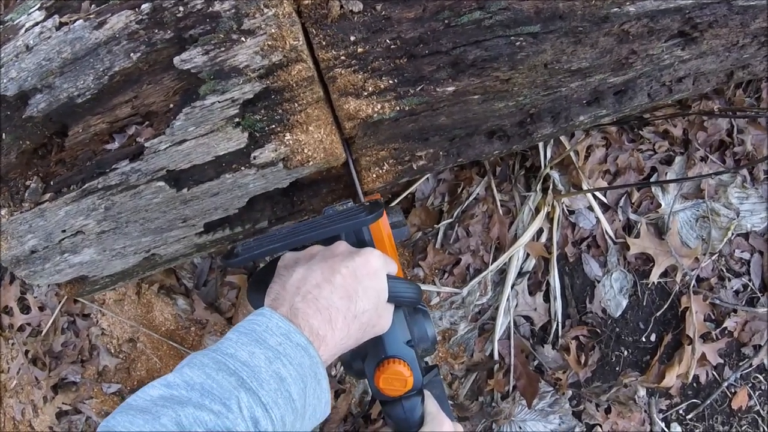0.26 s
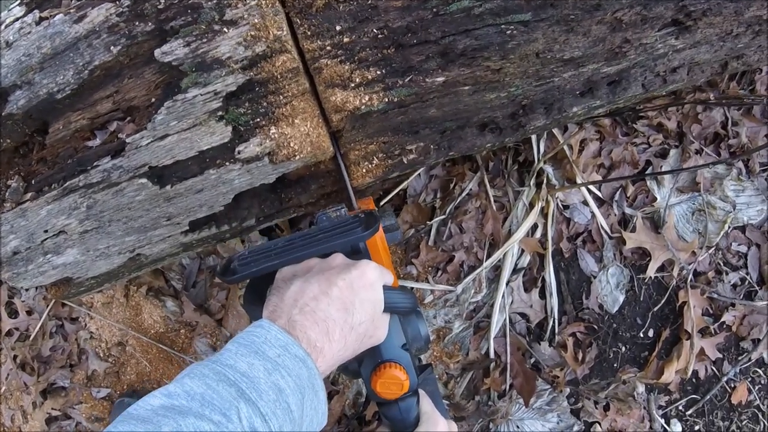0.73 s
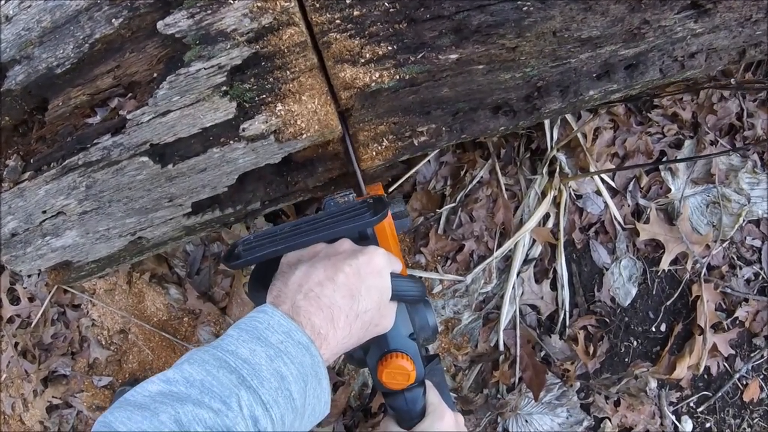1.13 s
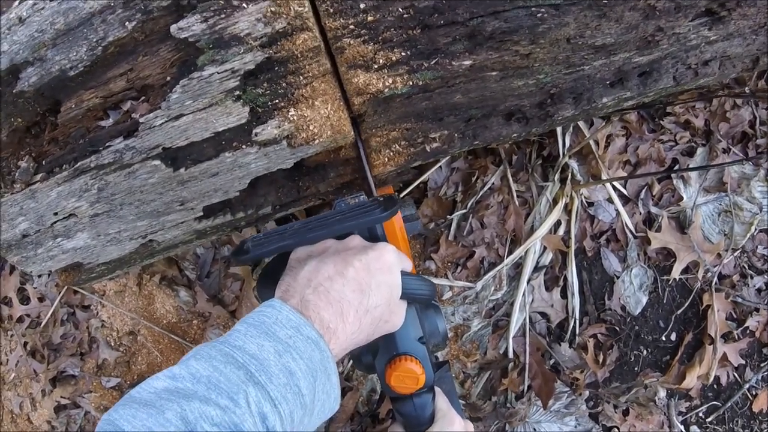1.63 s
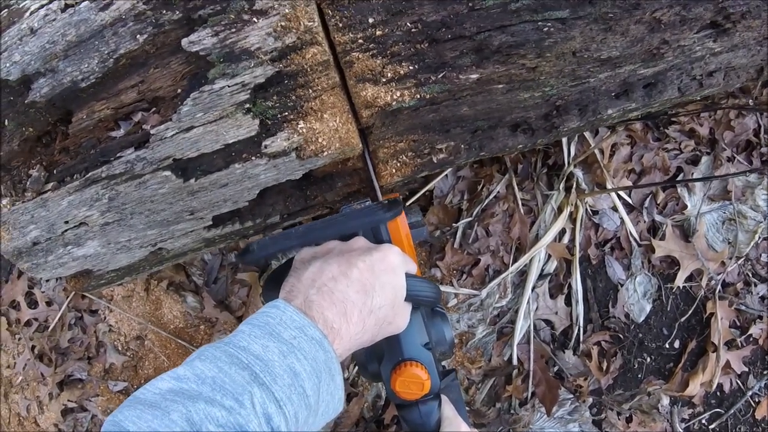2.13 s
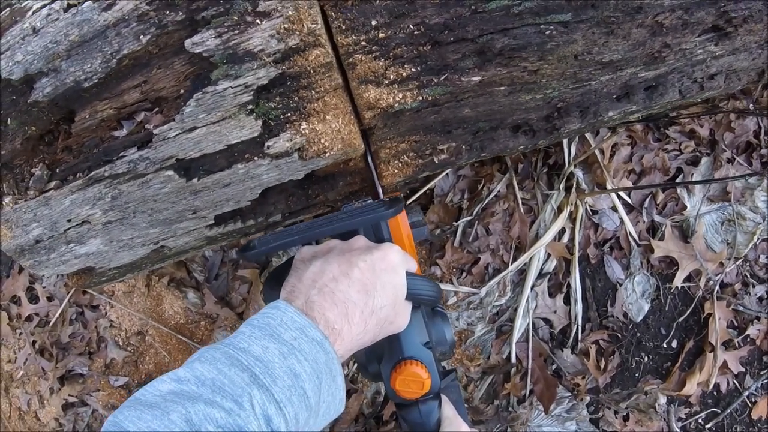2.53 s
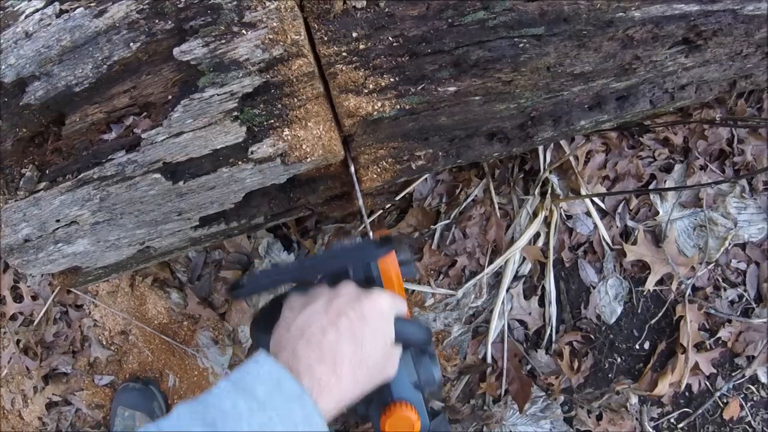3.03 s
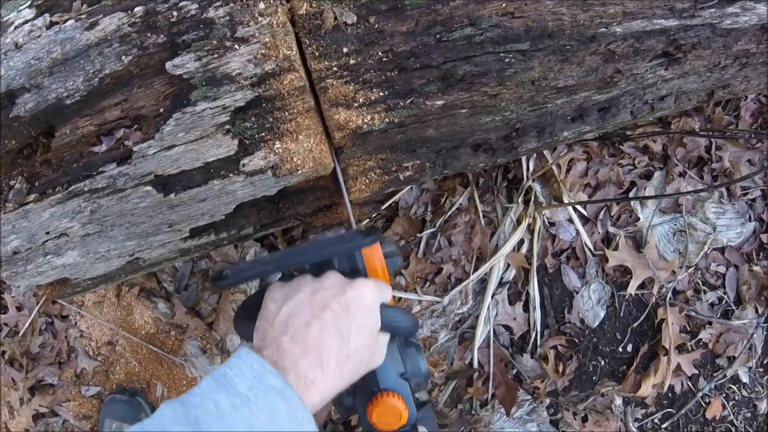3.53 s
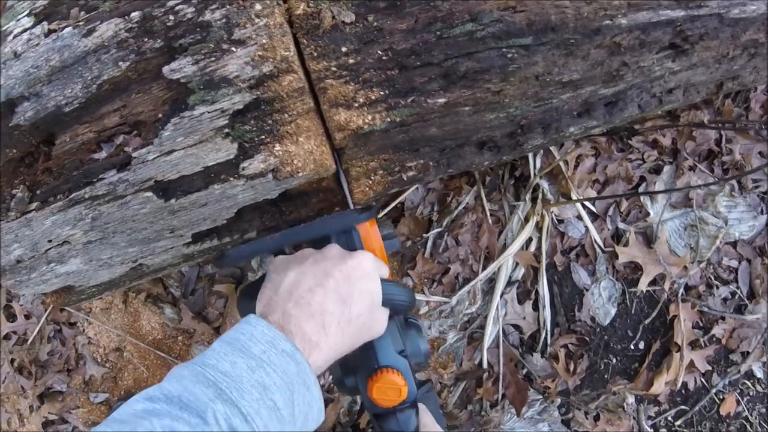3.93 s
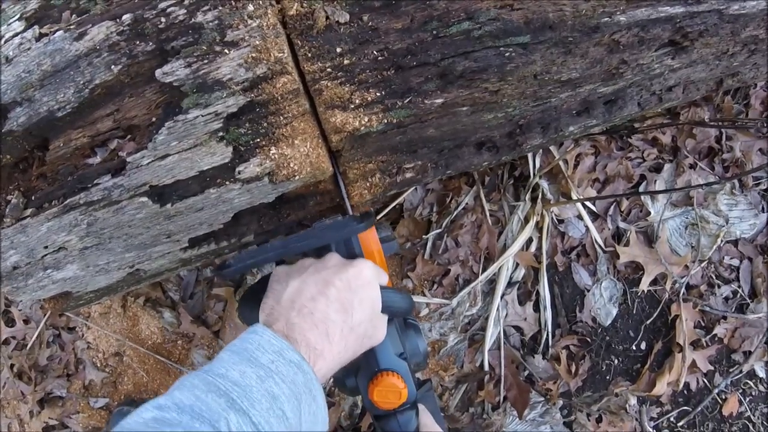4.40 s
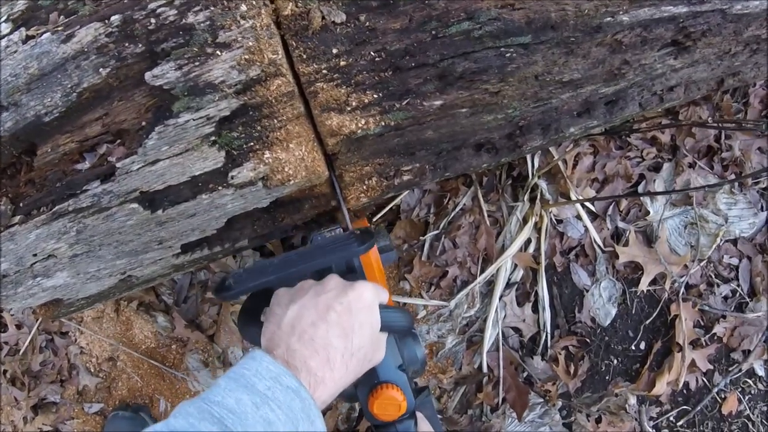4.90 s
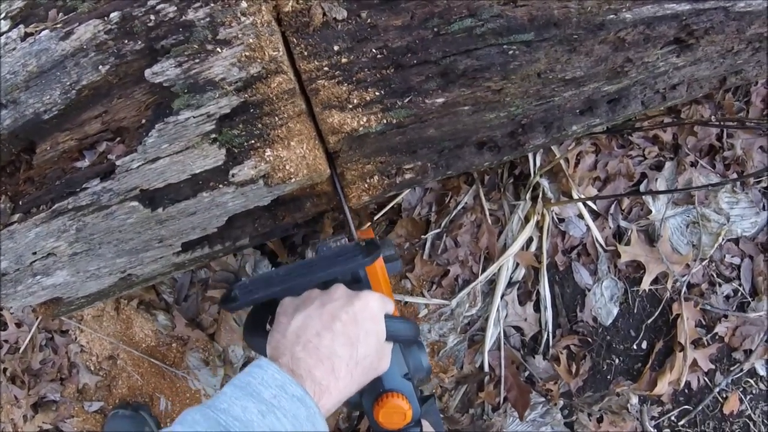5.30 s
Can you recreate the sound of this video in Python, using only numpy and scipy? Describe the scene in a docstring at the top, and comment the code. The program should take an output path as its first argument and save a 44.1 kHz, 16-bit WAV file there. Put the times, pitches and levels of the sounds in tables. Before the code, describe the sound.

Outdoors, close and dry in mono, a battery chainsaw is already cutting at full loudness. A dense, gritty wood rasp, bright metallic chain sizzle and reedy electric whine blend together, fluttering with tiny dropouts. The pitch climbs a little until about 0.6 s, holds, then sags from 1.3 s to its lowest near 2.2 s as the saw labours. At 2.54 s the trigger is released; the pitch plunges in about 0.14 s, with a clatter and short ringing tone. Near-quiet follows, with faint low air, a soft drag at 2.76 s, dull plastic bumps from 2.8 s and crisp clicks around 3.0 and 3.15 s. A stronger knock at 3.34 s and thin high whistle accompany the rapid spin-up, reaching a higher, free-running whine. Pushes at about 3.84, 4.27, 4.65, 5.02 and 5.36 s each bite sharply, drop the pitch and ease, the last still cutting at the end, about 5.5 s.

```python
"""A chainsaw rasps and whines through a log, stops, clicks a few times and cuts again, over faint outdoor air.
Drive: sines at multiples of the shaft speed, which sags under load: one long lean, then five short pushes.
Chain: noise pulsed by each passing link, filtered by the wood and the steel guide bar.
Stopped saw: filtered noise bursts for clicks, knocks and drags; a ringing sine at the brake, a whistle at the start."""
import sys
import numpy as np
from scipy.fft import rfft, irfft, next_fast_len
from scipy.io import wavfile
from scipy.ndimage import uniform_filter1d, minimum_filter1d, map_coordinates

SR = 44100
rng = np.random.default_rng(int(sys.argv[2]) if len(sys.argv) > 2 else 0)


def to_wav(s):
    """Save 16-bit WAV."""
    ch = np.atleast_2d(s).T  # columns
    pcm = np.round(np.clip(ch, -1, 1) * 32767)  # PCM
    wavfile.write(sys.argv[1], SR, pcm.astype(np.int16))


N = 244736

# Response of the wood. Each row: frequency in Hz, relative level in dB.
WOOD_SPECTRUM = [(210, -34), (350, -15.5), (575, -7), (794, -5), (954, 0), (1150, -5), (1520, -2),
                 (1840, -4.5), (2030, -7.5), (2280, 1), (2570, -10.5), (2770, -3), (3120, -7.5), (4270, -8),
                 (4600, -3), (5980, -32), (10100, -120)]
# Response of the steel guide bar. Each row: frequency in Hz, relative level in dB.
BAR_SPECTRUM = [(2470, -42.5), (4200, -32), (4290, -19), (4430, -22), (4780, -1), (5500, 3.5), (6160, -6),
                (6410, -8.5), (7570, -20.5), (8010, -32.5), (9450, -36), (11000, -52), (14300, -82),
                (22000, -120)]
# Slow level drift as the bar moves through the log.
# Each row: time in s, then base levels in dB of rasp, bar ring, thud and drive tones.
CUT_LEVELS = [(0, -27, -19, -41.5, 0), (.6, -24.5, -21, -44, 0), (1.25, -25.5, -17.5, -40, 1.5),
              (2.5, -27.5, -19.5, -39.5, 0), (3.5, -22.5, -19.5, -42, 0), (3.85, -24.5, -22, -41.5, 1),
              (4.4, -24.5, -19.5, -39.5, .5), (5, -26, -22.5, -43, -2), (5.55, -26, -21, -40, -2.5)]

TURNS_PER_LAP = 6  # shaft turns per lap of the chain
RELEASE_AT_S, PULL_AT_S = 2.54, 3.32  # trigger let go, trigger pulled again


def amp(db):
    """Decibels to gain."""
    return 10 ** (np.asarray(db) / 20)


def unit(x):
    """Scale to rms 1."""
    return x / np.sqrt(np.mean(x ** 2) + 1e-20)


def curves(rows):
    """One value per sample for each column after the time."""
    s, *cols = np.transpose(rows)
    return [np.interp(np.arange(N) / SR, s, c) for c in cols]


def wobble(rate_hz):
    """Smooth random curve with rate_hz knots a second."""
    knots = rng.standard_normal(int(N * rate_hz / SR) + 4)
    return map_coordinates(knots, [np.arange(N) * rate_hz / SR])


def body(x, spectrum):
    """Ring x through a minimum-phase filter with the given (Hz, dB) points."""
    m = 2 * next_fast_len(N)
    f, db = np.transpose(spectrum)
    gain = amp(np.interp(np.log(np.fft.rfftfreq(m, 1 / SR) + 1), np.log(f), db))
    cepstrum = irfft(np.log(np.maximum(gain, 1e-6)))
    # fold onto positive time: causal response
    cepstrum[1:m // 2] *= 2
    cepstrum[m // 2 + 1:] = 0
    response = np.exp(rfft(cepstrum))
    return irfft(rfft(x, m) * response, m)[:N]


def scrape(push, spectrum, grit_db):
    """Gritty friction noise of rms 1 that follows a force and rings a body."""
    grit = amp(grit_db * wobble(1500))
    return unit(body(push * grit * rng.standard_normal(N), spectrum))


def outdoors():
    """Low rumble and faint drifting hiss of the open air, and a distant hum."""
    # Rumble. Each row: frequency in Hz, relative level in dB.
    air_spectrum = [(12, -20.5), (20, -10.5), (40, 3.5), (59, -11), (70, -3.5), (92, 2.5), (104, -18),
                    (114, -17), (172, -12.5), (195, -51.5), (600, -38.5), (780, -78.5), (1320, -120)]
    # Hiss of the surroundings. Each row: frequency in Hz, relative level in dB.
    hiss_spectrum = [(200, 6.5), (700, 3), (1700, -2.5), (3000, -10), (4300, -17), (6500, 0), (8000, -11.5),
                     (9200, -10.5), (11500, -27), (13500, -31)]
    hum = unit(np.sin(2 * np.pi * 86 * np.arange(N) / SR + .4 * wobble(5.7)))
    drift = amp(1.5 * wobble(10))
    hiss = drift * unit(body(rng.standard_normal(N), hiss_spectrum))
    rumble = unit(body(rng.standard_normal(N), air_spectrum))
    return amp(-49) * rumble + amp(-65) * hum + amp(-57.5) * hiss


def knocks():
    """The plastic body bumps the log as the saw is shifted: dull decaying noise bursts."""
    # Each row: start in s, relative level in dB.
    knock_rows = [(2.824, -37), (2.861, -37.5), (2.876, -56), (2.96, -35.5), (2.97, -34), (3.31, -43),
                  (3.34, -22.5)]
    shell_spectrum = [(300, -19), (900, 0), (1800, 0), (3000, -19), (6000, -27), (12000, -44)]  # Hz, dB
    rise_s, t60_s = .003, .054
    t = np.arange(N) / SR
    blows = sum(np.clip((t - s) / rise_s, 0, 1) * amp(db - 60 * np.abs(t - s) / t60_s)
                for s, db in knock_rows)
    return amp(-6) * blows * unit(body(rng.standard_normal(N), shell_spectrum))


def clicks():
    """The slack, still chain clicks against the bar: noise bursts with instant onset and fast decay."""
    # Each row: start in s, relative level in dB, 60 dB decay time in s.
    click_rows = [(2.9882, -17, 0.029), (2.991, -22.5, 0.02), (3.045, -29.5, 0.0063), (3.134, -30, 0.027),
                  (3.1511, -18, 0.024), (3.154, -39, 0.018)]
    # Each row: frequency in Hz, relative level in dB.
    clack_spectrum = [(240, -56.5), (400, -36), (659, -13), (932, -16.5), (1210, -8), (1470, -15),
                      (1920, -4), (4660, -26), (4990, -9), (5820, -5.5), (11000, -29.5), (14300, -66),
                      (22000, -120)]
    t = np.arange(N) / SR
    blows = sum((t >= s) * amp(db - 60 * np.abs(t - s) / t60_s) for s, db, t60_s in click_rows)
    return amp(-8.5) * blows * unit(body(rng.standard_normal(N), clack_spectrum))


def drags():
    """The stopped chain rubs the kerf as the saw is drawn back, and faintly rings the bar."""
    # Each row: centre in s, half-width in s, rasp level in dB, bar ring level in dB.
    drag_rows = [(2.76, .09, -55.5, -58), (3.085, .045, -61, -56)]
    t = np.arange(N) / SR
    wood = scrape(1, WOOD_SPECTRUM, grit_db=6)
    bar = scrape(1, BAR_SPECTRUM, grit_db=5.5)
    return sum(np.exp(-((t - s) / width_s) ** 2) * (amp(rasp_db) * wood + amp(ring_db) * bar)
               for s, width_s, rasp_db, ring_db in drag_rows)


def snags():
    """A cutter caught in the wood jolts the log: a low noise swell."""
    # Each row: centre in s, level in dB, half-width in s.
    snag_rows = [(3.896, -21.5, 0.014)]
    log_spectrum = [(60, -11), (170, -12), (700, -6), (2000, -18), (8000, -67)]  # Hz, dB
    t = np.arange(N) / SR
    jolt = sum(amp(db) * np.exp(-((t - s) / width_s) ** 2) for s, db, width_s in snag_rows)
    return jolt * unit(body(rng.standard_normal(N), log_spectrum))


def starter():
    """The controller chops the current at a fixed rate until the motor gets going: a short whistle."""
    # One row: time of the peak in s, peak level in dB, rise and fall time constants in s.
    whistle = (3.385, -30, .022, .03)
    t = np.arange(N) / SR
    s, db, rise_s, fall_s = whistle
    swell = np.exp(-np.maximum((s - t) / rise_s, (t - s) / fall_s))
    return amp(db) * swell * np.sin(2 * np.pi * 5050 * t + .3 * wobble(120))


def brake():
    """The chain stops with a jerk and the housing's main mode rings out: a decaying sine."""
    rise_s, t60_s = .011, .11
    t = np.arange(N) / SR - 2.615
    swell = np.clip(t / rise_s, 0, 1) * amp(-24 - 60 * np.abs(t) / t60_s)
    return swell * np.sin(2 * np.pi * 2290 * t + .5 * wobble(120))


def spin():
    """Share of running speed: the brake stops the chain evenly, the motor brings it back fast and levels off."""
    brake_s, spin_up_s = .14, .17
    t = np.arange(N) / SR
    stopping = np.clip(1 - (t - RELEASE_AT_S) / brake_s, 0, 1)
    starting = np.tanh(np.maximum(t - PULL_AT_S, 0) / spin_up_s)
    return stopping + starting


def braking():
    """0 in the first cut, rising to 1 as the brake takes hold, 0 again once the trigger is pulled."""
    return (np.arange(N) / SR < PULL_AT_S) * np.minimum(3 * (1 - spin()), 1)


def load(free_speed_hz):
    """The hand's pressure: speed lost in turns/s, grip of the cutters (0-1), accent of each first bite in dB."""
    # First cut, one long lean. Each row: time in s, shaft speed in turns/s before braking.
    lean_rows = [(0, 66.8), (.17, 68), (.27, 70.6), (.55, 75.1), (.82, 73.7), (1.16, 74.2), (1.33, 68.6),
                 (1.45, 69.4), (1.61, 64.2), (1.73, 62.65), (1.98, 61.9), (2.11, 57.6), (2.21, 56.7),
                 (2.31, 58.3), (2.54, 57.5)]
    # Second cut, rocked in with short pushes. Each row: start in s, length in s, easing-off time constant
    # in s, speed lost in turns/s, first bite accent in dB.
    push_rows = [(3.836, 0.16, .24, 10.15, 6), (4.265, .215, .09, 12, 6.5), (4.649, .2, .1, 9.6, 2.5),
                 (5.021, .2, .13, 6.7, 5.5), (5.356, 0.23, .13, 6.64, 3)]
    catch_s, bite_s, sag_s = .017, .064, .085  # cutters catch, first bite fades, shaft slows
    t = np.arange(N) / SR
    leaning = t < PULL_AT_S
    grip = leaning * spin() ** 2  # the cutters let go as the chain slows
    sag_hz = leaning * (free_speed_hz - curves(lean_rows)[0])
    bite_db = np.zeros(N)
    for s, length_s, ease_s, lost_hz, db in push_rows:
        age_s = np.maximum(t - s, 0)
        held = np.exp(-np.maximum(age_s - length_s, 0) / ease_s)
        caught = np.minimum(age_s / catch_s, 1)
        sag_hz = sag_hz + lost_hz * np.minimum(age_s / sag_s, 1) * held
        grip = np.maximum(grip, caught * held)
        bite_db = bite_db + db * caught * np.exp(-(age_s / bite_s) ** 2)
    return sag_hz, grip, bite_db


def bites(turns, worn_db, chance_db, sway_db, fade_db):
    """Force of the chain: each link strikes and fades; uneven cutters come round again every lap."""
    links_per_turn = 6
    link, age = np.divmod(turns * links_per_turn, 1)  # age: 0-1 within a link
    link = link.astype(int)
    cutters = rng.permutation(np.linspace(-2, 2, links_per_turn * TURNS_PER_LAP))
    fibres = rng.standard_normal(N)
    sway = np.sin(2 * np.pi * turns)  # the sprocket tightens the chain once a turn
    worn = worn_db * cutters[link % len(cutters)]
    return unit(amp(worn + chance_db * fibres[link] + sway_db * sway - fade_db * age))


def chain(turns, grip, bite_db):
    """Cutters tear the wood and fling dust; the links slap in the bar's groove, hardest at one point of each lap."""
    # Thud of the log. Each row: frequency in Hz, relative level in dB.
    thud_spectrum = [(60, -40.5), (110, -13.5), (165, -0.5), (235, -0.5), (330, 2), (480, 2), (700, -28),
                     (1200, -77)]
    # Sawdust flung off the chain. Each row: frequency in Hz, relative level in dB.
    spray_spectrum = [(3000, -32), (6200, 1), (7000, 0.5), (8200, -6.5), (9500, -5.5), (11000, -24),
                      (14000, -54), (22000, -100)]
    # Moments at which the cutting noise dips briefly, in s.
    dip_times = [.075, .19, .335, .68, 1.312, 1.615, 1.91, 1.975, 2.465, 3.81, 4.108, 4.6, 4.855, 5.09]
    ring_light_db, thud_light_db = -1.5, -7  # change when the chain runs light
    rasp_db, ring_db, thud_db, _ = curves(CUT_LEVELS)
    force = bites(turns, worn_db=1.5, chance_db=-0.24, sway_db=1.5, fade_db=6.5)
    stiff_link = amp(3 * np.sin(np.pi * turns / TURNS_PER_LAP) ** 40)
    chatter = amp(0.45 * wobble(130))  # the bar shudders in the kerf
    slap = stiff_link * chatter * bites(turns, worn_db=1.24, chance_db=-1.1, sway_db=2, fade_db=4)
    moving = spin() > 0
    force, slap = moving * force, moving * slap
    jerk_db = 4.5 * braking()  # clatter as the brake jerks the chain

    thud_db = thud_db + thud_light_db * (1 - grip) + .8 * bite_db + jerk_db + 1.1 * wobble(12)
    thud = amp(thud_db) * scrape(force, thud_spectrum, grit_db=1)
    rasp = amp(rasp_db - 0.67 + .3 * bite_db + jerk_db) * scrape(force, WOOD_SPECTRUM, grit_db=1.5)
    spray = amp(rasp_db - 10.5 + 1.3 * bite_db) * spin() * scrape(force, spray_spectrum, grit_db=.5)
    ring_gain = amp(ring_db + ring_light_db * (1 - grip) + bite_db) * spin() ** .3
    ring = ring_gain * scrape(slap, BAR_SPECTRUM, grit_db=1.6)

    dip = sum(np.exp(-((np.arange(N) / SR - s) / .009) ** 2) for s in dip_times)
    return amp(-11 * dip) * (thud + rasp + spray) + amp(-4 * dip) * ring


def tone(turns, order, flutter_db, blur_rad):
    """One multiple of the shaft speed, shaken in level and phase by the chain."""
    phase = 2 * np.pi * (order * turns + rng.random()) + blur_rad * wobble(140)
    return unit(amp(flutter_db * wobble(90)) * np.sin(phase))


def drive(turns, grip, bite_db):
    """Motor and gear tones: the strongest swell under load, and wherever they cross a resonance."""
    # Strongest tones. Each row: shaft order, change when running light in dB, flutter in dB, phase blur in rad.
    motor_tones = [(11, -1, 3.5, .2), (33, -1, 2.5, .44), (66, -8, 4, .8), (96, -12, 3, 1.05),
                   (144, -20, 2, .7)]
    # Resonances the strongest tones glide through. Each row: frequency in Hz, gain in dB.
    resonances = [(400, -50.5), (620, -38), (690, -31), (780, -32), (870, -39.5), (905, -40.5), (935, -26),
                  (1500, -29), (1880, -26.5), (2060, -41.5), (2300, -26.5), (2570, -31.5), (2800, -20.5),
                  (3750, -35.5), (4100, -34.5), (4350, -37), (4570, -21), (4730, -29.5), (4900, -22),
                  (5250, -24), (5550, -16), (6000, -18.5), (6350, -26.5), (7100, -54.5), (7550, -34.5),
                  (8200, -51), (9000, -43.5), (10000, -54), (12000, -78.5)]
    # Weaker tones, which follow the rasp level. Each row: shaft order, relative level in dB.
    overtones = [(20, -26), (21, -14.5), (22, -13), (30, -19), (32, -22), (36, -19), (37, -15.5), (38, -16),
                 (44, -11.5), (48, -7.5), (55, -20), (73, -19), (77, -14), (88, -14), (97, -23.5),
                 (99, -15)]
    # Plastic housing, passing the weaker tones. Each row: frequency in Hz, gain in dB.
    housing = [(400, -11.5), (1250, -9.5), (1550, 1), (1780, 3.5), (2020, -6.5), (2280, 2.5), (2550, -3.5),
               (2800, -3.5), (3550, -3), (4100, -6), (4400, -14), (5400, 0.5), (6300, -3.5), (6900, -9.5),
               (9000, -47)]
    mesh_offset_db, mesh_light_db, mesh_brake_db = 1.5, 2, 5  # against the rasp; running light; braking
    rasp_db, _, _, tones_db = curves(CUT_LEVELS)
    low, mid, high, gear, top = [amp(light_db * (1 - grip)) * tone(turns, order, flutter_db, blur_rad)
                                 for order, light_db, flutter_db, blur_rad in motor_tones]
    # the lowest tone throbs twice each lap of the chain
    throb = unit(amp(3 * np.sin(2 * np.pi * turns * 2 / TURNS_PER_LAP)))
    # the gear meshes tighter once a turn
    runout = unit(amp(1.4 * np.sin(2 * np.pi * turns) + 1.5 * wobble(400)))
    strong = amp(tones_db) * (throb * low + mid) + amp(0.36 * bite_db) * high + runout * gear + top
    whine = body(strong, resonances)

    mesh_db = rasp_db + tones_db + mesh_offset_db + mesh_light_db * (1 - grip)
    mesh_db = mesh_db + mesh_brake_db * braking() + 0.32 * bite_db
    weak = sum(amp(db) * tone(turns, order, flutter_db=2.8, blur_rad=.45) for order, db in overtones)
    return whine + body(amp(mesh_db) * weak, housing)


def scene():
    """One shaft drives the tones and the chain; its speed sags with the load and trembles."""
    free_speed_hz = 85.6  # shaft turns/s with no load
    sag_hz, grip, bite_db = load(free_speed_hz)
    speed_hz = spin() * (free_speed_hz - sag_hz) * (1 + 0.00204 * wobble(35))
    turns = np.cumsum(speed_hz) / SR
    # loudness grows as a power of the speed while the chain starts or stops
    saw = spin() ** 1.08 * (drive(turns, grip, bite_db) + chain(turns, grip, bite_db))
    return (saw + starter() + brake() + snags() + drags() + clicks() + knocks() + outdoors())[None]


def record(dry):
    """A fast limiter holds the loudest peaks down, and nothing is kept above the band limit."""
    top_hz = 13500
    needed = np.minimum(1, amp(-2.5) / (np.abs(dry) + 1e-9))
    held = dry * uniform_filter1d(minimum_filter1d(needed, size=120), size=120)
    m = next_fast_len(N + SR // 2)
    return irfft(rfft(held, m) * (np.fft.rfftfreq(m, 1 / SR) < top_hz), m)[..., :N]


dry = scene()
out = record(dry)
to_wav(out)
```